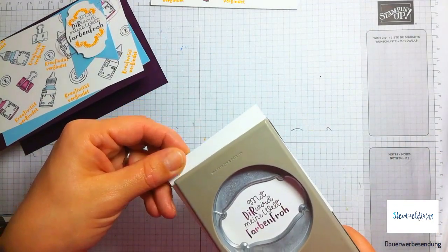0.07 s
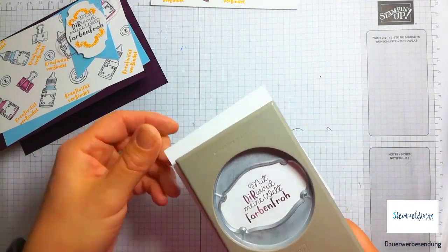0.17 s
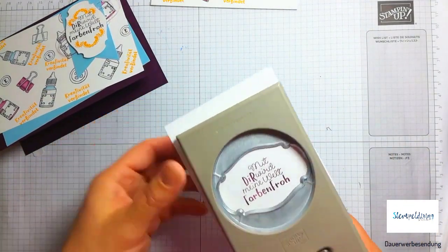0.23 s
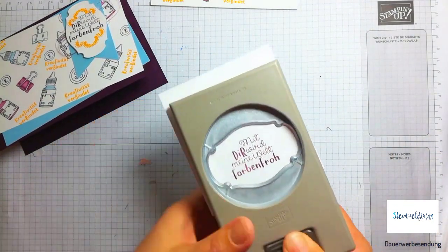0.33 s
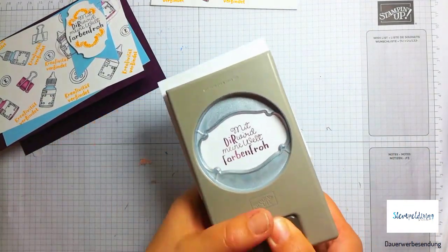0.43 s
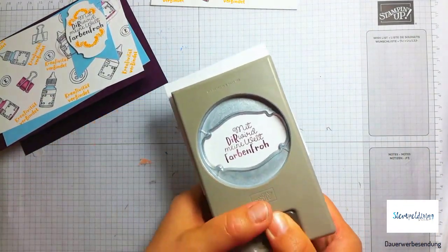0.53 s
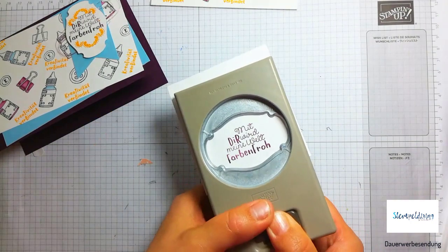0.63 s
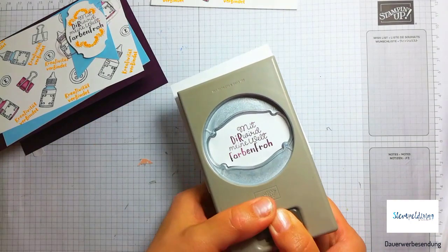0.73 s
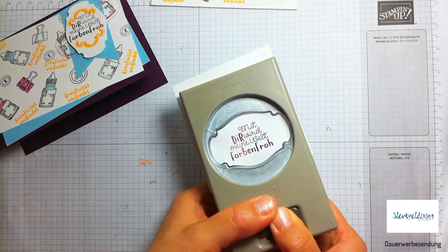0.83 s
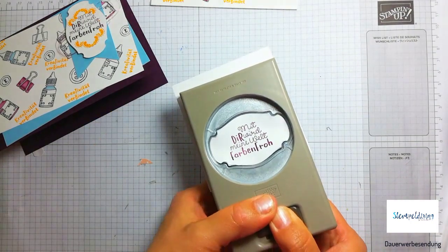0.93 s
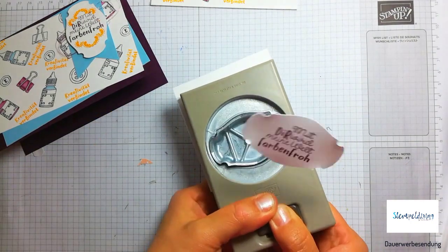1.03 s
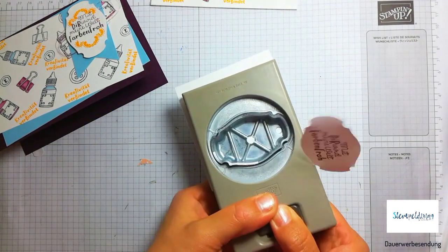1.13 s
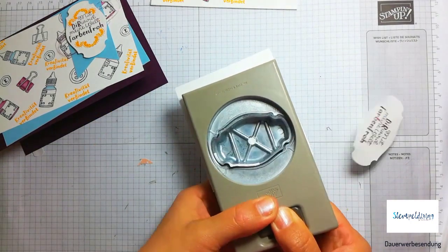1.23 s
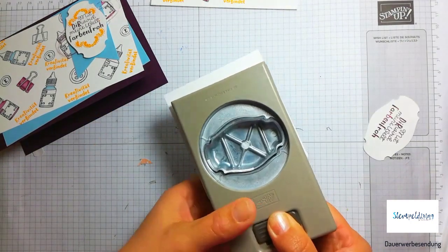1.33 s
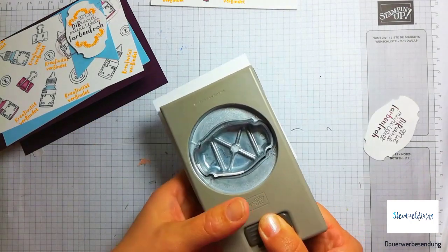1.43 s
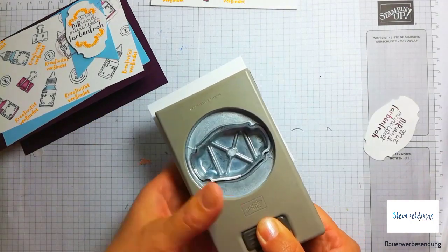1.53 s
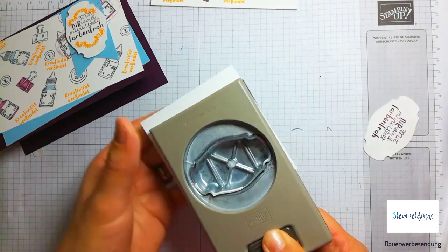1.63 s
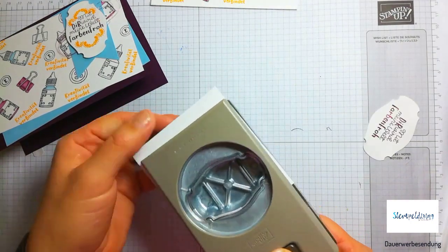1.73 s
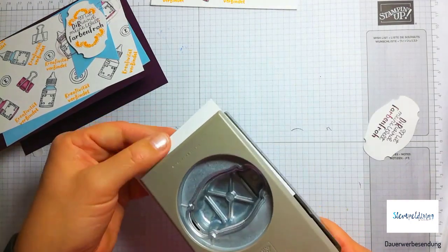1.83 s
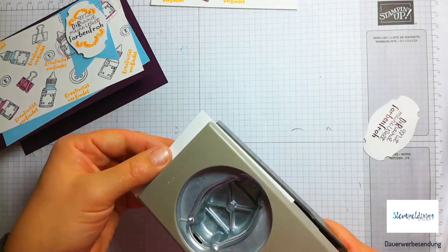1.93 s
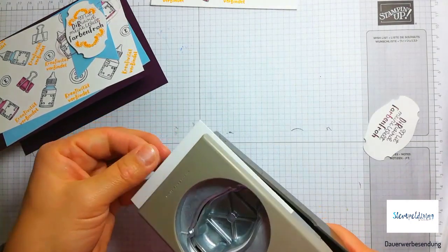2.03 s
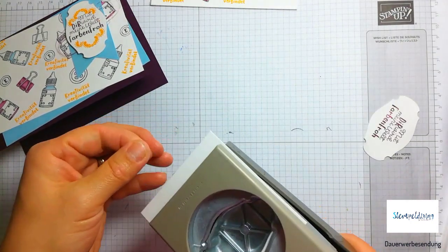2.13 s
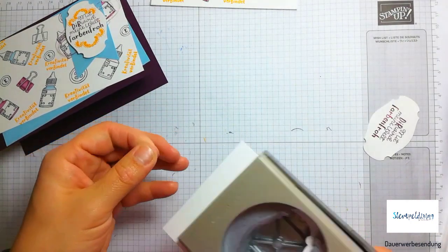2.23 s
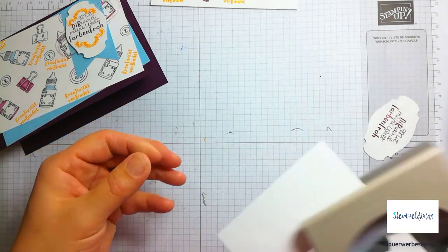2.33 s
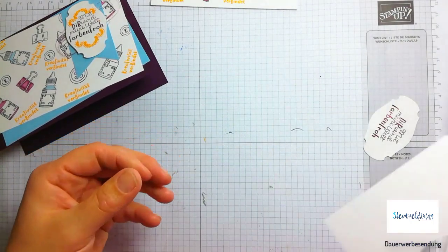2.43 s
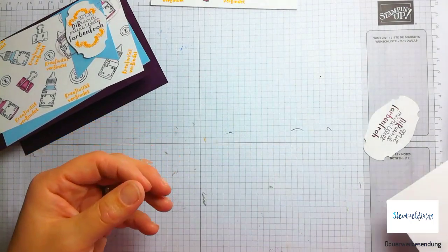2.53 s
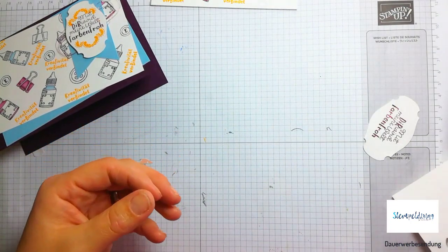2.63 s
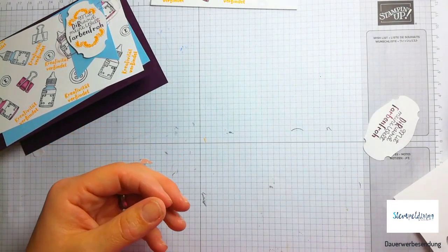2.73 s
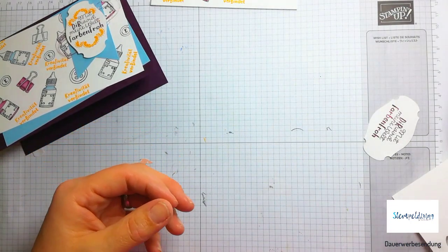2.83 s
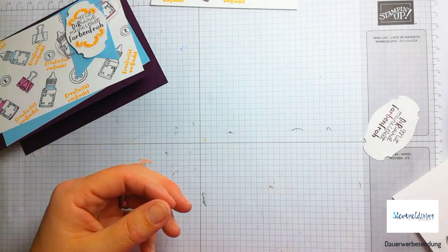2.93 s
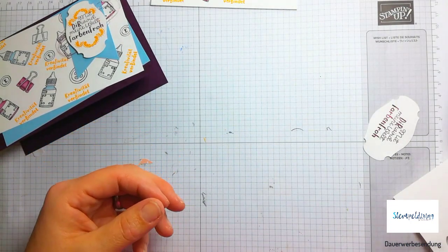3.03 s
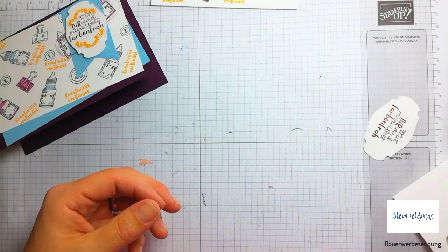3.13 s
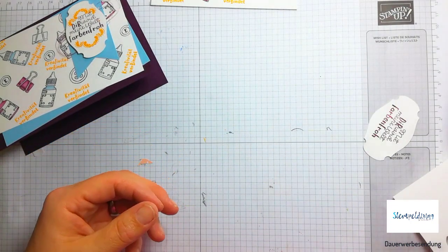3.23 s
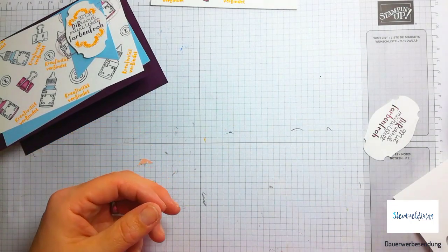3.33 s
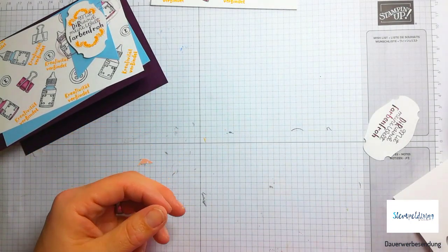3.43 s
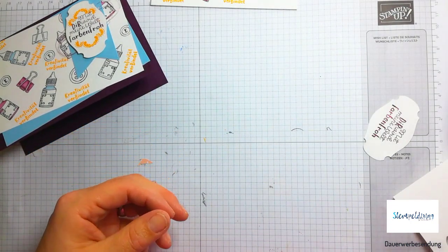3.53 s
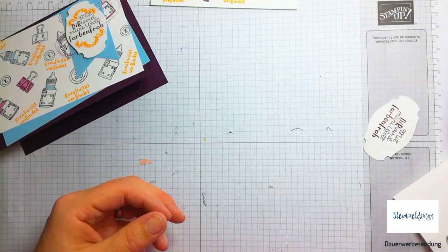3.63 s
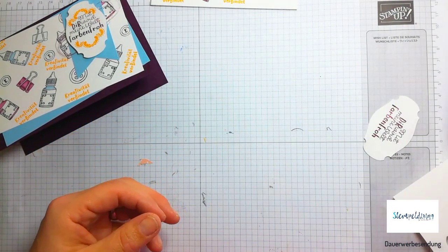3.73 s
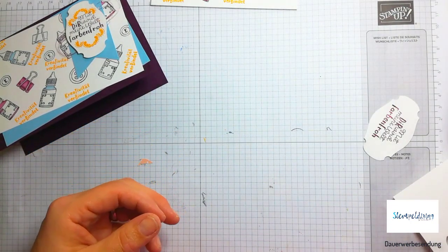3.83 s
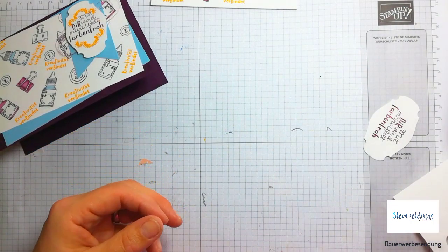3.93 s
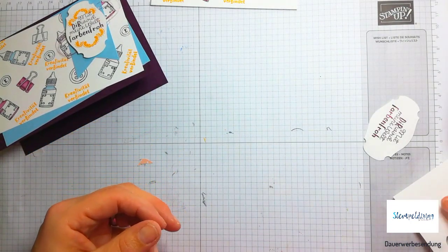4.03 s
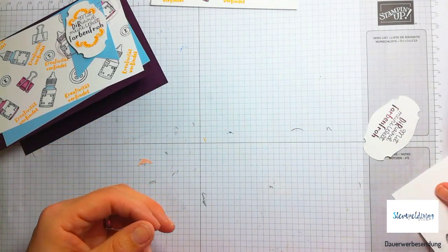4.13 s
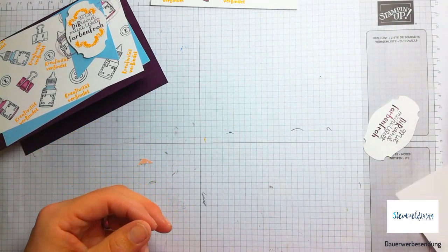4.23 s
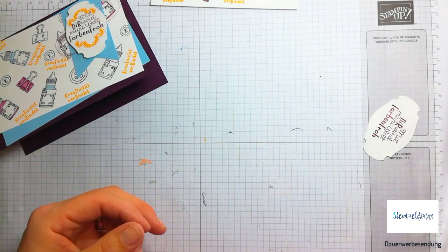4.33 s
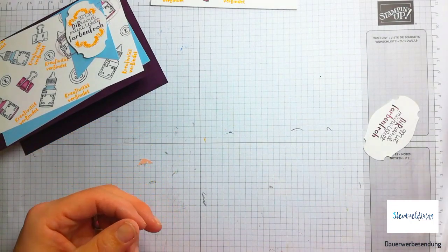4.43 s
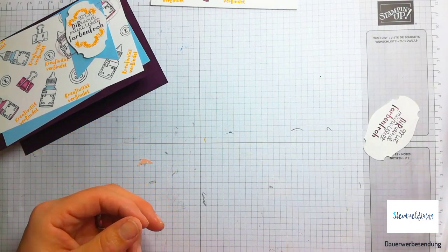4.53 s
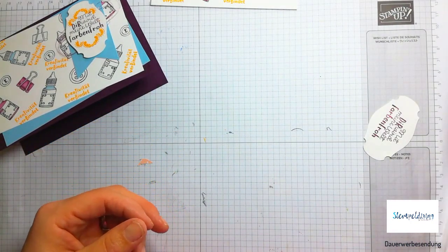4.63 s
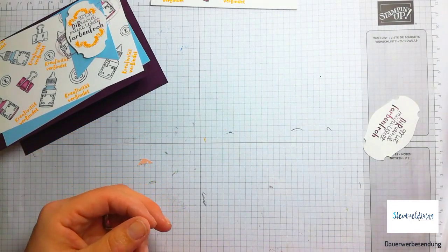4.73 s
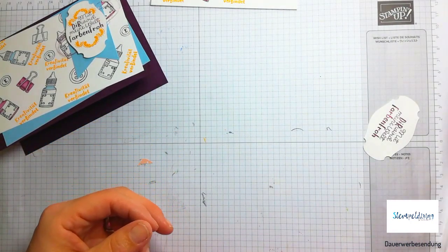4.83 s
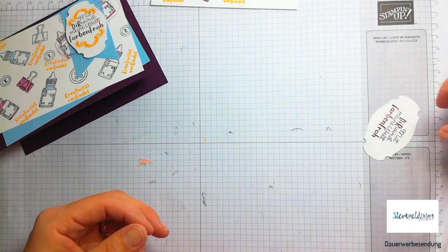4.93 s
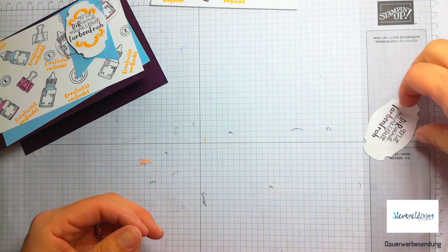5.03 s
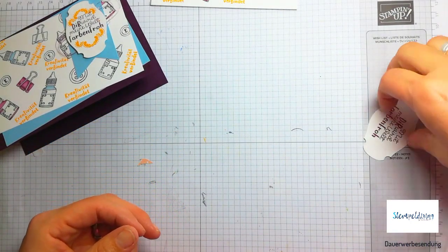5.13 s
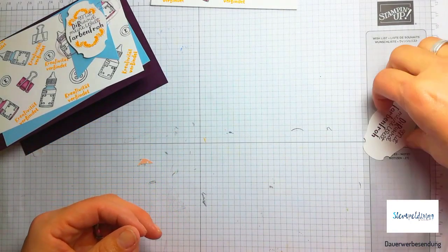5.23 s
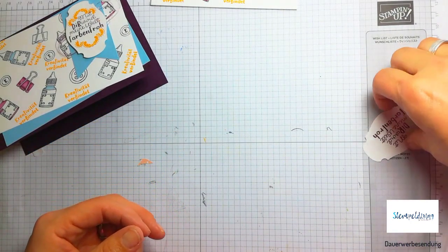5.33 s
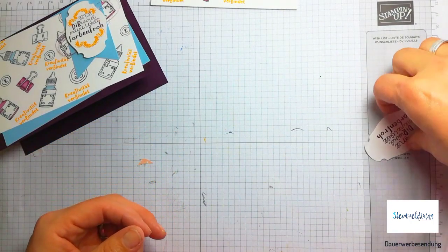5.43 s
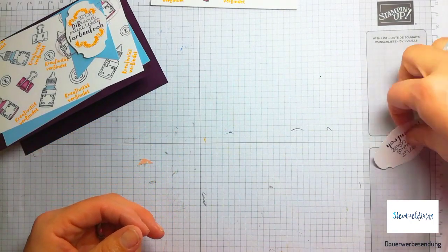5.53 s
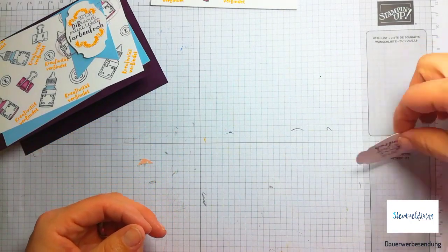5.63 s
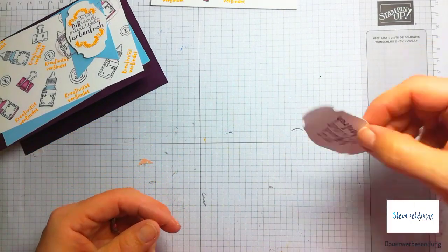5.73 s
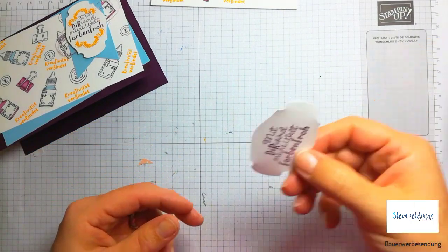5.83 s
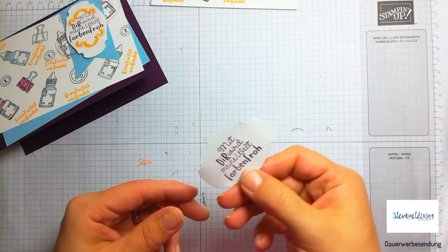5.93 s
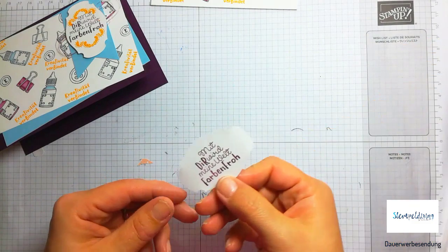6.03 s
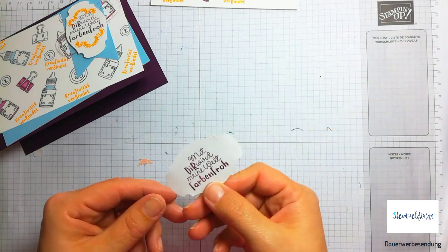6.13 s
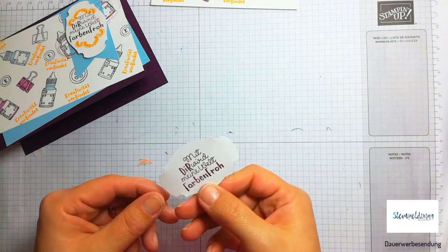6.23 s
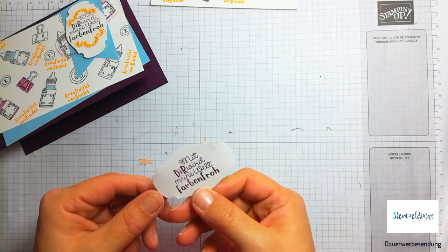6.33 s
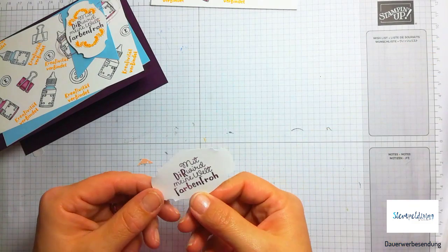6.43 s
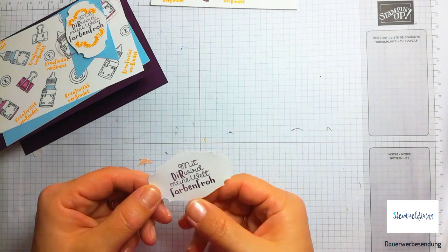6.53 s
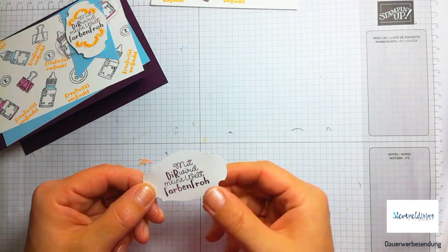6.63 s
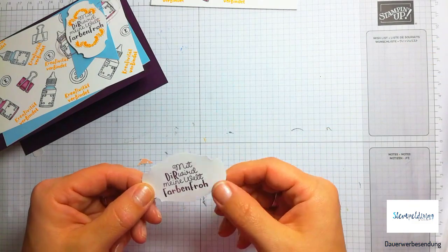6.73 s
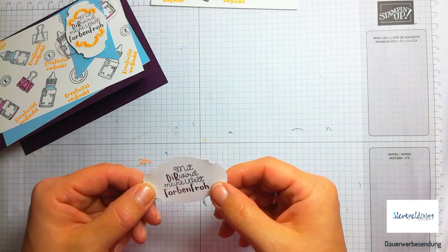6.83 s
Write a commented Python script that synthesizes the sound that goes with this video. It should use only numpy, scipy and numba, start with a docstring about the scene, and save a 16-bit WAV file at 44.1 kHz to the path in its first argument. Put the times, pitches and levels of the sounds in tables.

```python
"""A small furnished room, with low house rumble and microphone hiss, answers a metal craft punch on a desk.
The punch is squeezed through cardstock: fibres crack in steps (noise bursts through the punch's resonances),
then the die snaps through; every blow also shakes spring and desk. The card is slid out of the slot (scraping
micro-slips, knocks), the punch is set down with three bounces (rung desk modes, short knocks with much room),
and card and cut piece are handled (snaps and paper friction)."""
import sys
import numpy as np
from scipy import signal
from scipy.fft import rfft, irfft
from scipy.io import wavfile
from scipy.ndimage import uniform_filter1d
from numba import njit

SR = 44100
rng = np.random.default_rng(int(sys.argv[2]) if len(sys.argv) > 2 else 0)


def int16_out(signal):
    """Quantize to a 16-bit WAV file."""
    q = np.round(np.clip(np.atleast_2d(signal).T, -1, 1) * 32767)
    wavfile.write(sys.argv[1], SR, q.astype(np.int16))


N = 303849
CUTOFF_HZ = 16000


def from_db(db):
    """Decibels to gain."""
    return 10 ** (np.asarray(db) / 20)


def rms_one(x):
    """Scale to unit rms."""
    return x / np.sqrt(np.mean(x ** 2) + 1e-20)


def at_hz(points, hz):
    """Read a spectrum on a log-frequency axis."""
    point_hz, value = np.array(points).T
    return np.interp(np.log(hz), np.log(point_hz), value)


def shaped(x, spectrum):
    """Steady noise given a colour; rms 1."""
    hz = np.arange(1, x.shape[-1] // 2 + 2) * SR / x.shape[-1]
    return rms_one(irfft(rfft(x) * from_db(at_hz(spectrum, hz)), x.shape[-1]))


def band(x, kind, hz, order=2):
    """Butterworth filter."""
    return signal.sosfilt(signal.butter(order, hz, kind, fs=SR, output="sos"), x)


def resonance(x, hz, width_hz):
    """Two-pole resonance with gain 1 on top."""
    r = np.exp(-np.pi * width_hz / SR)
    zeros = [(1 - r * r) / 2, 0, (r * r - 1) / 2]
    poles = [1, -2 * r * np.cos(2 * np.pi * hz / SR), r * r]
    return signal.lfilter(zeros, poles, x + 1e-18)


def ring(x, hz, t60_s):
    """A unit click sets a decaying sine of starting height 1 ringing."""
    r, w = from_db(-60 / (t60_s * SR)), 2 * np.pi * hz / SR
    return signal.lfilter([0, np.sin(w)], [1, -2 * r * np.cos(w), r * r], x + 1e-18)


@njit
def glide(x, hz, r, rate):
    """Two-pole resonance whose centre moves."""
    y = np.zeros(len(x))
    for i in range(2, len(x)):
        feedback = 2 * r * np.cos(2 * np.pi * hz[i] / rate) * y[i - 1] - r * r * y[i - 2]
        y[i] = x[i] - x[i - 2] + feedback
    return y


def moving_peak(x, hz, width_hz):
    """Noise coloured by a wandering resonance; rms 1."""
    r = np.exp(-np.pi * width_hz / SR)
    return rms_one(glide(x, np.clip(hz, 500, 12000), r, float(SR)))


def pan(x, left_right_db):
    """Place a sound by its left-right level difference, at most 6 dB."""
    half_db = np.clip(left_right_db, -6, 6) / 2
    return np.array([x * from_db(half_db), x * from_db(-half_db)])


def add(out, s, x):
    """Mix a short stereo sound in at time s."""
    i = round(s * SR)
    out[:, i:i + x.shape[1]] += x[:, :N - i]


BURST_RISE_MS = 0.25


def burst(decay_ms, size=4410):
    """A short noise burst for cracks, taps and knocks: starts almost at once, has an even spectrum."""
    fade = np.exp(-np.arange(4096) / SR / (np.clip(decay_ms, .2, 15) / 1000))
    fade = fade * (1 - np.exp(-np.arange(1, 4097) / SR / (BURST_RISE_MS / 1000)))
    x = rng.standard_normal(4096) * fade
    for _ in range(3):   # flatten the spectrum, then restore the decay
        spectrum = rfft(x)
        x = irfft(spectrum / (abs(spectrum) + 1e-12))
        x = x / np.sqrt(abs(uniform_filter1d(x ** 2, size=41)) + 1e-20) * fade
    return np.pad(x, (0, size - len(x)))


def grit(per_s, spread_db):
    """Dense uneven micro-slips of a rubbing surface, coming in clumps; rms 1."""
    sizes = from_db(spread_db * np.minimum(rng.exponential(1, N), 4)) * rng.choice([-1, 1], N)
    clumps = from_db(2.0 * rms_one(band(rng.standard_normal(N), "band", [15, 70])))
    return rms_one(clumps * sizes * (rng.random(N) < per_s / SR))


def patchy(x, depth_db):
    """The contact keeps shifting, so patches of the spectrum swell and sink; rms 1."""
    spectra = signal.stft(x, nperseg=512)[2]
    field = rng.standard_normal(spectra.shape[-2:])
    for _ in range(2):
        field = uniform_filter1d(uniform_filter1d(field, size=7, axis=0), size=5, axis=1)
    patches = spectra * from_db(depth_db * rms_one(field))
    return rms_one(signal.istft(patches, nperseg=512)[1][..., :N])


STROKE_ATTACK_S, STROKE_DEPTH_DB = 0.0079, 30   # attack and release times count over this depth


def strokes(rows):
    """Strokes set in, run from first to last level and die; the loudest sets level, colour and pitch."""
    t = np.arange(0, N + 32, 32) / SR
    start, end, first_db, last_db, release_s, colour_db, hz = np.array(rows).T[:, :, None]
    run = np.clip((t - start) / np.maximum(end - start, 1e-3), 0, 1)
    attack = np.maximum(start - t, 0) / STROKE_ATTACK_S
    release = np.maximum(t - end, 0) / np.maximum(release_s, 2e-3)
    level_db = first_db + (last_db - first_db) * run - STROKE_DEPTH_DB * (attack + release)
    loudest = level_db.argmax(axis=0)
    curves = level_db.max(axis=0), colour_db[loudest, 0], hz[loudest, 0]
    return [np.interp(np.arange(N) / SR, t, c) for c in curves]


# house rumble over time: (time [s], level [dB])
RUMBLE_LEVELS = [(0.0, -62.5), (0.46, -70.5), (0.79, -64.5), (1.46, -71), (1.84, -64), (3.049, -65),
                 (3.18, -56.5), (3.53, -62), (4.49, -70.5), (5.45, -64.5), (5.87, -67), (6.89, -65)]
# rumble colour: (frequency [Hz], relative density [dB per Hz])
RUMBLE_COLOUR = [(15, -30), (32, -8), (53, 2.5), (81, -10.5), (139, 1.5), (184, -5), (210, -22.5),
                 (288, -23), (400, -46.5)]
# microphone hiss colour: (frequency [Hz], relative density [dB per Hz])
HISS_COLOUR = [(180, -28.5), (300, -8.5), (405, -13), (689, -13), (2480, -19), (11900, -23.5),
               (13500, -28.5), (15000, -41)]
RUMBLE_WAVER_DB, HISS_DB = 1.5, -78


def background():
    """Rumble mostly alike in both channels, swelling a few times a second; hiss separate in each."""
    s, db = np.transpose(RUMBLE_LEVELS)
    mid, side = shaped(rng.standard_normal((2, N)), RUMBLE_COLOUR)
    waver_db = RUMBLE_WAVER_DB * rms_one(band(rng.standard_normal(N), "band", [1, 4], order=1))
    level_db = np.interp(np.arange(N) / SR, s, db) + waver_db
    rumble = from_db(level_db) * (mid + from_db(-16.5) * side * [[1], [-1]])
    return rumble + from_db(HISS_DB) * shaped(rng.standard_normal((2, N)), HISS_COLOUR)


# early decay of the room: (frequency [Hz], T60 [s])
ROOM_DECAY = [(125, 0.16), (1000, 0.24), (5000, 0.27), (13000, 0.24)]
ROOM_GAP_S, ROOM_FADE_S = 0.002, 0.57   # the tail is faded out early, as if by a noise gate


def room(x):
    """Diffuse reflections, unrelated left and right, dying band by band."""
    t, edges = np.arange(SR // 2) / SR, 90 * 2 ** np.arange(0, 7.6, .5)
    white = rng.standard_normal((2, 2, len(t)))   # neighbouring bands get unrelated noise
    tail = np.zeros((2, len(t)))
    for k, (lo, hi) in enumerate(zip(edges, edges[1:])):
        decay = from_db(-60 * t / at_hz(ROOM_DECAY, np.sqrt(lo * hi)))
        tail += band(white[k % 2], "band", [lo, hi]) * decay
    tail = tail * np.clip(t / ROOM_GAP_S, 0, 1) ** 2 * np.exp(-(t / ROOM_FADE_S) ** 4)
    tail = tail / np.sqrt(np.sum(tail ** 2, axis=1, keepdims=True))
    return signal.fftconvolve(x.mean(axis=0)[None], tail, axes=1)[:, :N]


# straight path and desk-top reflections, left then right microphone: (arrival [ms], level [dB])
MIC_PATHS = [
    [(0, 2), (.45, -7.5), (1.3, -14.5)],
    [(0, 4.5), (.3, -14), (1.7, -10.5)],
]


def direct(near):
    """Straight path and desk reflections sum at each microphone."""
    return np.array([sum(from_db(db) * np.roll(x, round(ms * SR / 1000)) for ms, db in paths)
                     for x, paths in zip(near, MIC_PATHS)])


# faint hiss while things are moved or loaded: (start [s], end [s], level [dB], band centres [Hz])
WHISTLE_BANDS = [(0.53, 0.617, -76, [1400, 4750, 9250]), (1.47, 1.67, -87, [2020, 580]),
                 (2.77, 3.0, -89, [2000, 570, 2570, 4800]), (4.24, 4.56, -88, [400])]
WHISTLE_WIDTH_HZ, WHISTLE_SWELL_S = 240, .05


def whistles():
    """Noise twice through narrow resonances, swelling in and ending four times as fast."""
    out, t = np.zeros(N), np.arange(N) / SR
    noise = rng.standard_normal(N)
    for start, end, db, centres_hz in WHISTLE_BANDS:
        part = slice(int(start * SR), int(end * SR))
        thin = 0
        for hz in centres_hz:
            narrow = resonance(noise[part], hz, WHISTLE_WIDTH_HZ)
            narrow = rms_one(resonance(narrow, hz, WHISTLE_WIDTH_HZ))
            thin = thin + narrow * np.sqrt(min(centres_hz[0] / hz, 1))   # fainter above the first
        edges = np.minimum(t[part] - start, 4 * (end - t[part])) / WHISTLE_SWELL_S
        out[part] += from_db(db) * thin * np.clip(edges, 0, 1)
    return pan(out, -6)


# card rubbing on paper and fingers: (start [s], end [s], start level [dB], end level [dB],
# release [s], share below 2.5 kHz [dB], crinkle pitch [Hz])
RUSTLE_STROKES = [(0.37, 0.43, -78, -75.5, 0.13, -3, 5100), (1.312, 1.33, -45, -60, 0.057, -20, 4070),
                  (2.24, 2.29, -82.5, -59.5, 0.052, -9, 3400), (2.29, 2.44, -53.5, -55, 0.019, -7.5, 3660),
                  (2.62, 2.625, -53.5, -59.5, 0.097, -27, 4140), (2.672, 2.677, -58, -60, 0.097, 3.5, 3750),
                  (2.738, 2.743, -64, -58.5, 0.07, 0.5, 3350), (4.09, 4.126, -69.5, -56, 0.15, -5, 3240),
                  (4.19, 4.236, -70, -51.5, 0.06, -5.5, 8670),
                  (4.258, 4.308, -55.5, -61.5, 0.069, -3, 7400), (4.68, 4.692, -59, -44, 0.13, -10.5, 2310),
                  (5.21, 5.27, -71.5, -78.5, 0.1, -26.5, 4281), (5.28, 5.35, -72, -67, 0.25, -28, 6265),
                  (5.45, 5.48, -64, -65.5, 0.046, -19.5, 4823), (5.48, 5.532, -68, -53, 0.14, -20, 4920),
                  (5.63, 5.672, -57, -55.5, 0.011, -30.5, 5100)]
# paper friction colour: (frequency [Hz], relative density [dB per Hz])
PAPER_COLOUR = [(900, -45), (1800, -5), (3000, -6.5), (4300, -3), (5700, -3.5), (8000, -6.5),
                (10500, -10.5), (15500, -13.5)]


def rustle():
    """Fine bright paper friction spread over the sheet; each stroke crinkles at its own pitch."""
    level_db, low_db, hz = strokes(RUSTLE_STROKES)
    slips, crinkles = grit(12000, spread_db=5.5), grit(2300, spread_db=0.5)
    side = band(grit(8400, spread_db=-2.0), "high", 3100, order=4)
    spread = from_db(2.0) * side * [[1], [-1]]
    high = shaped(slips + spread, PAPER_COLOUR) + from_db(-6.0) * moving_peak(crinkles, hz, 740)
    low = rms_one(band(crinkles + slips, "band", [1050, 2600], order=3))
    return from_db(level_db) * patchy(high + from_db(low_db) * low, depth_db=1.0)


# snaps and taps of card: (time [s], peak level [dB], centre [Hz], burst decay, at most 15 [ms],
# broad part against hump [dB], left-right, limited to +-6 [dB])
SNAPS = [(1.3085, -33.5, 6800, 1.57, -6, 0.5), (1.3183, -43, 4020, 3.7, -24.5, -3.5),
         (2.0999, -41.5, 4780, 0.91, -18, 0), (2.6185, -44, 4120, 2.7, -20, -8),
         (2.6741, -39, 3980, 0.9, -16, -9.5), (2.6818, -39, 3380, 2.9, -21, 8),
         (2.738, -41, 3280, 1.93, -31.5, -12), (2.7539, -45.5, 3210, 1.87, -35, -13),
         (4.124, -35, 2885, 21, -35.5, 6.5), (4.131, -41.5, 985, 4.4, -33.5, 5.5),
         (4.2354, -28, 4710, 1.9, 14.5, 6), (4.262, -43.5, 986, 3.4, -23.5, 1),
         (4.683, -31, 2260, 12.5, -20.5, -19), (4.6934, -29.5, 7700, 2.46, -13.5, 6.5),
         (5.2388, -58, 4384, 2.86, -17.5, 0.5), (5.6397, -49.5, 3694, 3.9, -19, 2),
         (5.663, -35.5, 6290, 5.1, -10.5, 6.5), (6.4091, -54.5, 3930, 3.9, -1, -1.5)]


def card_snaps():
    """A buckling card: a broad bright burst with a hump at its centre."""
    out = np.zeros((2, N))
    for s, db, hz, decay_ms, broad_db, pan_db in SNAPS:
        force = burst(decay_ms)
        hump = resonance(force, hz, 0.13 * hz)
        broad = band(band(force, "low", 11100), "high", 0.43 * hz, order=4)
        snap = hump + from_db(broad_db) * broad
        add(out, s, pan(from_db(db) * snap / abs(snap).max(), pan_db))
    return out


# desk-top modes: (frequency [Hz], level [dB], T60 [s])
DESK_MODES = [(124.8, -11, 0.94), (143, -6, 0.3), (181.5, -5.5, 0.32), (266, -2, 0.19), (299, 7, 0.068),
              (358.6, 8.5, 0.073)]
# plastic housing knocking on the desk: (frequency [Hz], width [Hz], level [dB])
KNOCK_MODES = [(847, 100, -2), (1041, 84, 7), (1450, 500, -7), (1963, 630, -4.5), (2260, 420, -1),
               (3057, 246, -7)]
# punch landing and bouncing: (time [s], thud peak level [dB], knock above thud [dB],
# knock low-pass [Hz], left-right, limited to +-6 [dB], gain of desk modes below 200 Hz [dB])
LANDINGS = [(3.0126, -34, 1, 4270, -1, 4.5), (3.1692, -39.5, 0, 3010, -8, -3.5),
            (3.201, -36.5, -14, 1450, 4, -4.5), (3.350, -42, -6, 1167, -7.5, -12.5)]


def bounces():
    """A short contact rings the desk top (thuds); the housing adds a short knock."""
    thuds, knocks = np.zeros((2, 2, N))
    for s, db, knock_db, dull_hz, pan_db, deep_db in LANDINGS:
        force = abs(burst(1.5, size=SR // 2))
        luck_db = rng.normal(0, 2, len(DESK_MODES))
        thud = 0
        for (hz, level_db, t60_s), mode_luck_db in zip(DESK_MODES, luck_db):
            mode_db = level_db + mode_luck_db + deep_db * (hz < 200)
            thud = thud + from_db(mode_db) * ring(force, hz, t60_s)
        thud = band(thud, "band", [112, 430], order=4)
        own = np.array([burst(4.5) for _ in range(2)])   # differs at each microphone
        blow = burst(4.28) + 1.1 * own
        modes = sum(from_db(level_db) * resonance(blow, hz, max(width_hz, 30))
                    for hz, width_hz, level_db in KNOCK_MODES)
        knock = from_db(-17.5) * blow + modes
        knock = band(band(knock, "high", 590, order=4), "low", dull_hz, order=3)
        add(thuds, s, pan(from_db(db) * thud / abs(thud).max(), pan_db))
        add(knocks, s, from_db(db + knock_db) * knock / abs(knock).max() * pan(1, pan_db)[:, None])
    return thuds, knocks


# die and housing modes: (frequency [Hz], width, at least 30 [Hz], level [dB])
BODY_MODES = [(1040, 170, 1.5), (1540, 20, 0), (1650, 450, -0.5), (1900, 53, -1.5), (2330, 33, -6),
              (2600, 440, -12), (3718.5, 80, -10.5), (4440, 37, -4), (6500, 200, -7.5), (7780, 400, -5.5)]


def body(x, luck_db):
    """The punch's resonances in parallel over a broad floor; it radiates little bass."""
    modes = sum((-1) ** k * from_db(db + luck_db[k]) * resonance(x, hz, max(width_hz, 30))
                for k, (hz, width_hz, db) in enumerate(BODY_MODES))
    floor = from_db(-5.5) * band(x, "low", 6000)
    return band(modes + floor, "high", 830, order=4)


# card dragging inside the punch: (start [s], end [s], start level [dB], end level [dB],
# release [s], treble [dB], scrape pitch [Hz])
DRAG_STROKES = [(0.63, 0.684, -56, -50, 0.064, -1, 1472), (0.756, 0.78, -48, -44.5, 0.12, 2.5, 1478),
                (0.9, 0.96, -64, -56, .01, -9.5, 1901), (1.675, 1.75, -57.5, -51, .05, -2, 1684),
                (1.75, 1.826, -52.5, -47, 0.12, -3, 1600), (2.022, 2.108, -55.5, -62, 0.054, -19.5, 1578)]
SLOT_HZ, SLOT_DB = 2600, -5.5   # the slot rings under dragged card


def drag():
    """Card edges scrape through the slot and excite the punch body."""
    level_db, treble_db, hz = strokes(DRAG_STROKES)
    slips = grit(3500, spread_db=2.5)
    scraped = rms_one(band(body(slips, np.zeros(len(BODY_MODES))), "low", 5800, order=4))
    slot = from_db(SLOT_DB) * rms_one(resonance(slips, SLOT_HZ, 110))
    low = band(scraped + moving_peak(slips, hz, 170) + slot, "high", 1000)
    high = rms_one(band(np.roll(slips, SR), "band", [3000, 10000]))
    scrape = patchy(low + from_db(treble_db) * high, depth_db=2.0)
    return pan(from_db(level_db) * scrape, 1.7)


# long beating rings of the return spring: (frequency [Hz], relative level [dB], T60 [s])
SPRING_MODES = [(1186, -57, 0.8), (1207, -59, 0.5)]
# hands and desk taking the blow: (frequency [Hz], relative level [dB], T60 [s])
JOLT_MODES = [(72, -41.5, 0.056), (137, -40.5, 0.032), (249, -40.5, 0.01), (320, -34, 0.03),
              (520, -24.5, 0.013)]
# low hum of the lever arm, then two low thumps of the desk:
# (time [s], frequency [Hz], level [dB], T60 [s])
LOW_RINGS = [(0.637, 449, -45, 0.12), (1.838, 422, -62, 0.086), (2.035, 340, -57, 0.033)]
# cracks, the snap, then knocks as the card is taken out: (time [s], peak level [dB],
# treble above body [dB], burst decay [ms], left-right, limited to +-6 [dB], part struck [Hz])
HITS = [(0.616, -27.5, 3.5, 5.9, -1, 1420), (0.638, -34.5, 0, 9.4, 5, 1210),
        (0.663, -54, 12, 8.3, -2, 1400), (0.684, -31, -4.5, 6.8, 0, 1220),
        (0.751, -26.5, -6.5, 9.2, 4, 1340), (0.784, -25.5, 1, 5.8, 6, 1400), (0.82, -33, -4, 6.5, 7, 1170),
        (0.88, -29.5, 1.5, 2.4, -2.5, 1890), (0.938, -31, -3, 8.3, 7.5, 1080),
        (0.963, -25.5, 4, 3.5, 22, 3550), (0.966, -25, -13, 2.7, -10, 1670),
        (0.993, -19, -16, 10, -28, 1900), (0.9944, -3.5, -6.5, 7.4, -2, 2650),
        (1.003, -0.5, -15.5, 7.9, 2.5, 1635), (1.664, -53, -14, 5.2, -1, 2520),
        (1.729, -44, 1.5, 9, -1, 2700), (1.839, -37, 1.5, 4.3, 18, 1406),
        (1.984, -38.5, -22, 4.9, 15.5, 1590), (2.02, -42, -19.5, 3.5, 18.5, 1595),
        (2.036, -37.5, -29.5, 5.8, 6.5, 1643)]
SHAKE_LAG_S = .005   # the blow takes this long to pass through
SOFT_RING_DB_PER_DB = 0.5   # the softer a blow, the more only the struck part rings


def punch():
    """Each hit is a burst through the body plus a bright burst; every blow also shakes spring and desk."""
    out, size = np.zeros((2, N)), int(.7 * SR)
    click = 1. * (np.arange(size) == 0)
    shake = sum(from_db(db) * ring(click, hz, t60_s) for hz, db, t60_s in SPRING_MODES + JOLT_MODES)
    shake = np.roll(band(shake, "high", 50), int(SHAKE_LAG_S * SR))
    for s, db, treble_db, decay_ms, pan_db, hz in HITS:
        force, aside = burst(decay_ms, size=SR // 5), burst(decay_ms, size=SR // 5)
        luck_db = rng.normal(0, 2.5, len(BODY_MODES))
        struck = from_db(1.0 - SOFT_RING_DB_PER_DB * db) * resonance(force, hz, 190)
        # the two faces radiate their treble unlike
        faces = force + from_db(-0.5) * band(aside, "high", 1400) * [[1], [-1]]
        dull_hz = min(15000 * from_db(0.22 * treble_db), CUTOFF_HZ)   # blunt blows are dull
        low = band(body(faces, luck_db) + struck, "low", dull_hz)
        high = band([burst(0.71 * decay_ms), burst(1.9 * decay_ms)], "band", [4500, 14500])
        add(out, s, from_db(db) * low / abs(low).max() * pan(1, pan_db)[:, None])
        add(out, s, pan(from_db(0.88 * db) * shake, pan_db))
        high_gain = pan(0.94, pan_db + 6.0)[:, None]   # the die faces left
        add(out, s, from_db(db + treble_db) * high / abs(high).max() * high_gain)
    for s, hz, db, t60_s in LOW_RINGS:
        add(out, s, pan(from_db(db) * ring(click, hz, t60_s), 0))
    return out


CARD_LAG_MS, FAR_LAG_MS = 0.22, 0.62   # card sounds and landings all reach the left microphone later
FAR_ROOM_DB = 12   # the punch is set down further off: its knocks drive the room harder
ROOM_DB, ROOM_ALIKE_HZ = -2, 250   # below this both microphones hear the same room


def scene():
    """All handling sounds, their room and the background."""
    card = card_snaps() + rustle()
    thuds, knocks = bounces()
    far = thuds + knocks
    card[0] = np.roll(card[0], round(CARD_LAG_MS * SR / 1000))
    far[0] = np.roll(far[0], round(FAR_LAG_MS * SR / 1000))
    near = punch() + drag() + whistles() + card
    wet = room(near + thuds + from_db(FAR_ROOM_DB) * knocks)
    side = band((wet[0] - wet[1]) / 2, "high", ROOM_ALIKE_HZ)
    wet = wet.mean(axis=0) + side * [[1], [-1]]
    return direct(near + far) + from_db(ROOM_DB) * wet + background()


def record(dry):
    """The loudest peaks are rounded, the top is cut."""
    rounded = .7 * np.tanh(dry / .7)
    return signal.sosfilt(signal.cheby2(12, 70, CUTOFF_HZ + 600, fs=SR, output="sos"), rounded)


dry = scene()
out = record(dry)
int16_out(out)
```